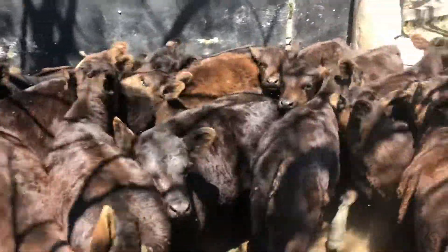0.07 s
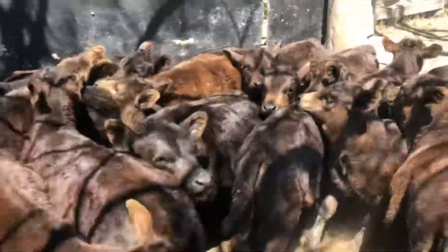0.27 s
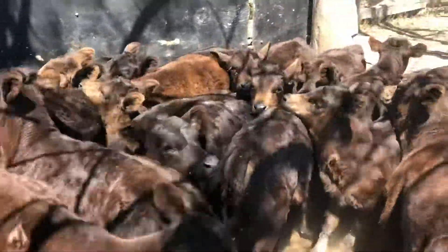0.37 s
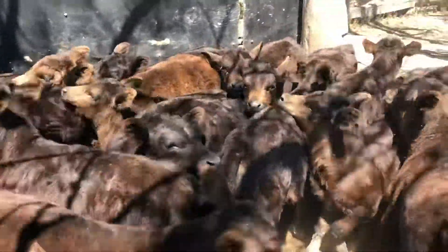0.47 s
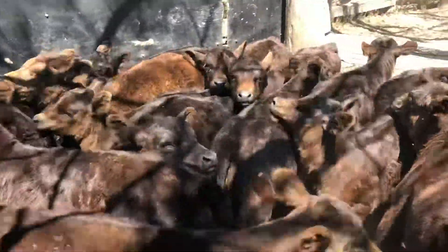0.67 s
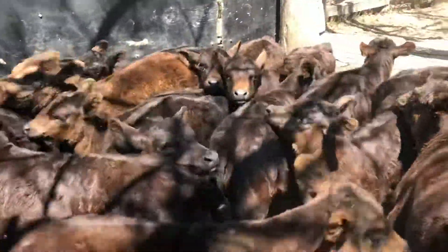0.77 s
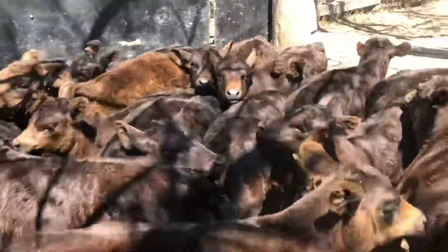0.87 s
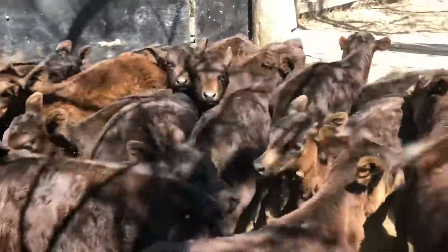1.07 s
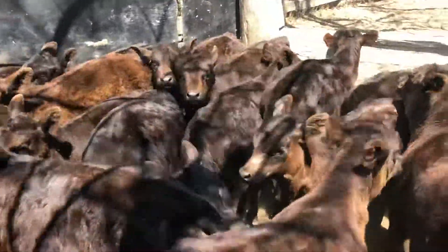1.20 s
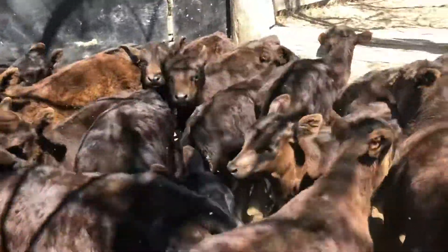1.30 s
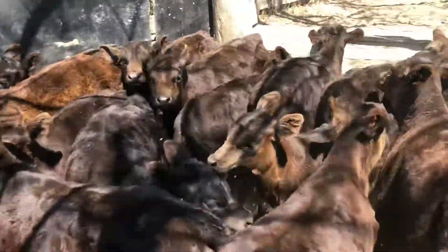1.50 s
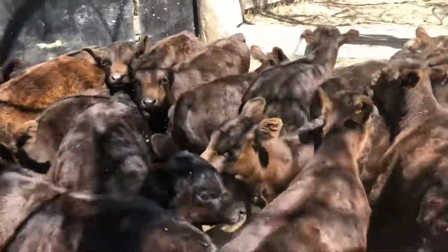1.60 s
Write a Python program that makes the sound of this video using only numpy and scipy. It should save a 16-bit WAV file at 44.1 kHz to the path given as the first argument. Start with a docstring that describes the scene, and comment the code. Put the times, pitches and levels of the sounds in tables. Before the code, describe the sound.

A calf's rising moo breaks into a rough bawl, with hooves shuffling in dirt.

```python
"""An outdoor pen crowded with calves. Close by, one starts a closed-mouth moo that climbs in pitch, opens
its mouth into a hoarse bawl with two pitches at once, and drops off in a grunt; a softer low moo follows.
Each call is a train of vocal-fold pulses ringing through the throat. Hooves thud and tick in the dirt,
flanks knock, hides rub, and the pen walls throw back a short echo over the hush of the yard."""
import sys
import numpy as np
from scipy import signal
from scipy.fft import rfft, irfft
from scipy.io import wavfile
from scipy.ndimage import uniform_filter1d

SR = 44100
rng = np.random.default_rng(int(sys.argv[2]) if len(sys.argv) > 2 else 0)


def master_out(mix):
    """Clip the mix to full scale and print it as 16-bit PCM to the path in sys.argv[1]."""
    frames = np.transpose(np.atleast_2d(mix))
    ceiling = np.clip(frames, -1, 1)
    pcm = np.round(ceiling * 32767).astype(np.int16)
    wavfile.write(sys.argv[1], SR, pcm)


N = 72765

# the close calf's regular fold vibration, in moo and grunt: (time [s], pitch [Hz])
CALF_PITCH = [(0, 81), (.036, 87), (.1, 97), (.17, 109), (.22, 117.5), (.296, 135), (.35, 158), (.4, 184),
              (.48, 220), (.58, 250), (.7, 270), (1.28, 305), (1.325, 220), (1.35, 165), (1.39, 102),
              (1.45, 85)]


def bawl():
    """Two fold vibrations at once, through a throat that brightens as the mouth opens."""
    # the hoarse, unsteady vibration: (time [s], pitch [Hz])
    hoarse_pitch = [(.48, 313.7), (.6, 319.1), (.72, 323.8), (.82, 317.7), (.92, 328.5), (1.02, 316.5),
                    (1.15, 316.2), (1.28, 318), (1.33, 294.4), (1.4, 222)]
    # the cleaner, higher one: (time [s], pitch [Hz], strength against the hoarse one [ratio])
    squeal_curve = [(.48, 324.9, 0.13), (.53, 357.9, 1), (.59, 386, 0.74), (.7, 415, 0.19),
                    (.83, 438.3, 0.29), (.94, 444.2, 1), (1.02, 445.7, 0.28), (1.15, 451.4, 0.44),
                    (1.23, 447, 0.13), (1.32, 435.5, 0.084)]
    # how hard the calf pushes: (time [s], level [dB])
    effort = [(.44, -65), (.475, -32.5), (.51, -27.5), (.56, -28.5), (.6, -26.5), (.72, -23.5), (.84, -23),
              (.92, -26), (.965, -22), (1.0, -25), (1.07, -21), (1.17, -22), (1.22, -24.5), (1.335, -24),
              (1.365, -43), (1.4, -66), (1.45, -78)]
    # mouth and strain: (time [s], mouth opening [0-1], roughness [0-1])
    strain = [(.48, 0, .5), (.72, 0.48, 0.49), (.84, 0.77, 0.62), (.94, 0.96, .6), (1.15, 1, 0.61),
              (1.31, 0.92, 0.68)]
    # throat resonances: (centre [Hz], width [Hz], mouth half open [dB], wide open [dB])
    formants = [(242.3, 30.4, 5.5, -13), (326, 99, -7.5, -6.5), (435, 48, -11.5, -10), (604.5, 49, 0, 1),
                (701.3, 72, -2.5, 2.5), (805, 30, -4, 0.5), (922.2, 31.2, 8.5, 3), (985.3, 78.4, 2, 6.5),
                (1150, 39, -11, 1), (1262.5, 46.4, -4.5, 2.5), (1363, 35, -27, 4), (1565, 112, -8.5, 0.5),
                (1788, 204, -9.5, -3), (2097, 205, -13, -7.5), (2657, 425, -25, -16.5)]
    # faint upper resonances: (centre [Hz], width [Hz], mouth half open [dB], wide open [dB])
    upper_formants = [(3516, 117, -54, -26), (4150, 130, -40, -29), (4507, 65, -30, -27.5),
                      (5500, 85, -38, -27.5), (5950, 350, -50, -31.5), (7020, 110, -41, -30.5),
                      (7500, 660, -43, -38), (8870, 710, -44, -38)]
    (pitch_hz,), (effort_db,) = in_time(hoarse_pitch), in_time(effort)
    mouth, rough = in_time(strain)
    squeal_hz, squeal_gain = in_time(squeal_curve)
    hoarse, _ = folds(pitch_hz, rough, half_lines=.23)
    squeal, _ = folds(squeal_hz, rough=.11, half_lines=.44)
    source = hoarse + squeal_gain * squeal
    opening_formants = [(hz, width, half_db + mouth * (wide_db - half_db))
                        for hz, width, half_db, wide_db in formants + upper_formants]
    shimmer_db = 1.2 * rough * drift(28)
    return throat(source, opening_formants) * from_db(effort_db + shimmer_db)


def moo():
    """Clean fold pulses behind a closed mouth, over a nasal hum; leads into the bawl and closes it."""
    # the moo's swell: (time [s], level [dB])
    swell = [(0, -72), (.04, -50.5), (.08, -46.5), (.15, -39), (.28, -34), (.37, -30.5), (.43, -28.5),
             (.465, -34.5), (.54, -40), (.68, -35.5), (.8, -64), (1.25, -73), (1.33, -41), (1.38, -46),
             (1.45, -78)]
    # the two lowest partials, through the nose: (time [s], fundamental [dB], octave [dB])
    nasal_partials = [(0, -64, -52), (.06, -44.5, -45), (.2, -39, -54), (.29, -51, -45), (.35, -57, -53),
                      (.41, -42.5, -51), (.5, -33, -56), (.56, -38, -71), (.72, -75, -59), (1.25, -73, -73),
                      (1.335, -33, -37.5), (1.39, -45.5, -50), (1.46, -60, -75)]
    # the throat with the mouth closed: (centre [Hz], width [Hz], level [dB])
    formants = [(186.5, 96, -2), (333, 60, -7), (601, 58, -9.5), (754, 77, -8), (963, 85, 2),
                (1260, 60, -5), (1335, 97, -1.5), (1682, 75, -6.5), (1830, 25, -9.5), (2158, 92, -10.5),
                (2458, 84, -10.5), (2814, 51, -16.5), (3043, 73, -18.5), (3380, 120, -22.5)]
    (pitch_hz,), (level_db,) = in_time(CALF_PITCH), in_time(swell)
    fundamental_db, octave_db = in_time(nasal_partials)
    source, cycles = folds(pitch_hz, rough=.07)
    phase = 2 * np.pi * cycles
    hum = from_db(fundamental_db) * np.cos(phase) + from_db(octave_db) * np.cos(2 * phase)
    return throat(source, formants) * from_db(level_db) + np.sqrt(2) * hum


def grunt():
    """As the bawl collapses, the slackening folds rattle through the closing throat."""
    # the grunt's swell: (time [s], level [dB])
    swell = [(1.2, -80), (1.28, -42), (1.335, -35), (1.365, -37.5), (1.4, -43), (1.44, -54), (1.5, -68)]
    # the closing throat: (centre [Hz], width [Hz], level [dB])
    formants = [(238, 50.9, 3), (322, 75.4, 2.5), (400, 130, -10), (622, 98, -5)]
    (pitch_hz,), (level_db,) = in_time(CALF_PITCH), in_time(swell)
    source, _ = folds(pitch_hz, rough=.257)
    return throat(source, formants) * from_db(level_db)


def low_moo():
    """A quiet, grainy moo with the mouth nearly shut."""
    # the call's contour: (time [s], pitch [Hz], level [dB])
    contour = [(1.42, 90.5, -58), (1.48, 96.5, -45), (1.52, 99.5, -44.5), (1.55, 97.5, -42.5),
               (1.59, 99.6, -40.5), (1.65, 100.2, -42.5)]
    # its throat: (centre [Hz], width [Hz], level [dB])
    formants = [(101, 73, -1), (223, 56, 6), (337, 69, 4.5), (526, 140, -1.5), (940, 52, 6),
                (1204, 210, -5.5), (1745, 95, -2.5), (1844, 87, -3.5)]
    pitch_hz, level_db = in_time(contour)
    source, _ = folds(pitch_hz, rough=.4)
    started = since(contour[0][0]) > 0
    return throat(source, formants) * from_db(level_db) * started


def folds(pitch_hz, rough, half_lines=0):
    """Vocal folds, one pulse a cycle; roughness adds jitter and rasp. Also returns the cycle count."""
    jitter = .04003 * rough * drift(70.5)
    cycles = np.cumsum(pitch_hz * (1 + jitter)) / SR
    count = np.floor(cycles)
    alternation = 1 + half_lines * (-1) ** count  # strong and weak in turn: a growl an octave down
    heights = np.diff(count, prepend=0) * np.sqrt(SR / pitch_hz) * alternation
    late = (cycles - count) * SR / pitch_hz  # splits each pulse between two samples
    pulses = heights * (1 - late) + np.roll(heights * late, -1)
    rasp = rng.standard_normal(N) * (1 + np.cos(2 * np.pi * cycles))
    return (1 - rough) * pulses + .82 * rough * rasp, cycles


def throat(source, formants):
    """Parallel resonances shape the pulses; the voice is then held at unit level."""
    voice = sum(resonance(source, hz, width) * from_db(db) for hz, width, db in formants)
    power = np.abs(uniform_filter1d(voice ** 2, size=1300))
    return voice / np.sqrt(power + 1e-12)


def jostling():
    """Soft hoof thuds, hollow knocks of flanks and snaps of grit."""
    # hooves landing in dirt: (time [s], level [dB], pitch [Hz])
    thuds = [(0.029, -34, 92), (0.208, -34, 61), (.385, -37, 70), (0.538, -40.5, 75), (.7, -34.5, 86),
             (0.818, -32.5, 71.12), (0.924, -37.5, 58.47), (1.188, -39.5, 71), (1.285, -40, 62.4),
             (1.616, -39, 87.1)]
    # flanks knocking together: (time [s], level [dB])
    knocks = [(.028, -40.5), (.401, -26.5)]
    # a flank's hollow ring: (pitch [Hz], level [dB], time to fall 60 dB [s])
    flank_modes = [(187.6, 0.5, 0.15), (292, -6.5, 0.054), (342, -2, 0.045)]
    # grit snapping under hooves: (time [s], level [dB], centre [Hz])
    ticks = [(0.2566, -44.5, 4420), (0.387, -43.5, 7950), (.412, -40, 5600), (0.7172, -40.5, 12000),
             (0.8616, -52, 6519), (.894, -48, 12000), (1.3983, -49, 9114)]
    thud_attack_s, thud_decay_s, tick_decay_s = .01, .018, .0037
    out = np.zeros(N)
    for s, db, hz in thuds:
        t = since(s)
        envelope = (1 - np.exp(-t / thud_attack_s)) * np.exp(-t / thud_decay_s)
        out += 2 * from_db(db) * envelope * np.sin(2 * np.pi * hz * t)
    for s, db in knocks:
        t = since(s)
        for hz, mode_db, t60 in flank_modes:
            out += from_db(db + mode_db - 60 * t / t60) * np.sin(2 * np.pi * hz * t)
    for s, db, hz in ticks:
        t = since(s)
        snap = rms_one(resonance(rng.standard_normal(N), hz, width_hz=hz))
        out += from_db(db) * (t > 0) * np.exp(-t / tick_decay_s) * snap
    return out


def scuffing():
    """A soft rub of hides with grains of dirt in it."""
    # hides rubbing and feet scuffing: (time [s], level [dB])
    swell = [(0, -57.5), (.2, -48.5), (.29, -48), (.36, -42.5), (.47, -52.5), (.54, -46.5), (.66, -58),
             (.8, -49), (.93, -43), (1.05, -48.5), (1.35, -47.5), (1.46, -64), (1.54, -57.5), (1.65, -60.5)]
    # the rub's tone colour: (frequency [Hz], level [dB])
    colour = [(500, -58.5), (2000, 31.5), (4000, 6), (7000, 3), (11000, 4.5), (16000, 2)]
    grains_per_s, grain_decay_s, grit_db = 350, .00043, 3
    onsets = rng.random(N) < grains_per_s / SR
    grains = onsets * from_db(2.8 * np.minimum(rng.exponential(1, N), 4))
    grain_envelope = signal.lfilter([1], [1, -np.exp(-1 / (grain_decay_s * SR))], grains + 1e-18)
    grit = from_db(grit_db) * rms_one(grain_envelope * rng.standard_normal(N))
    level_db = in_time(swell)[0] + .5 * drift(12)
    return from_db(level_db) * coloured(rng.standard_normal(N) + grit, colour)


def pen_echo(x):
    """Two wall echoes and a short, dull scatter from the herd; the bass is hardly thrown back."""
    # slaps off the pen walls: (delay [s], level [dB])
    walls = [(0.0117, -15), (0.0248, -25)]
    scatter_db, t60_s, low_cut_hz, high_cut_hz = -6.5, .24, 250, 4700
    t = np.arange(SR // 2) / SR
    dull = signal.sosfilt(signal.butter(2, high_cut_hz, fs=SR, output="sos"), rng.standard_normal(len(t)))
    tail = rms_one(dull) * from_db(-60 * t / t60_s) * (t > .008)
    passband_gain = np.sqrt(np.sum(tail ** 2) * SR / 2 / high_cut_hz)
    response = from_db(scatter_db) * tail / passband_gain
    for delay_s, db in walls:
        response[int(delay_s * SR)] += from_db(db)
    echo = signal.fftconvolve(x, response)[:N]
    return signal.sosfilt(signal.butter(2, low_cut_hz, "high", fs=SR, output="sos"), echo)


def yard():
    """A steady, bass-heavy bed of outdoor hush."""
    # the yard's tone colour: (frequency [Hz], level [dB])
    colour = [(20, -35), (35, -11), (55, -4), (100, -5.5), (250, -2.5), (500, -23), (1000, -8.5),
              (2000, -36), (4000, -22.5), (16000, -36.5)]
    return from_db(-47.5) * coloured(rng.standard_normal(N), colour)


def from_db(db):
    """Decibels to gain."""
    return 10 ** (np.asarray(db) / 20)


def rms_one(x):
    """Scale to unit rms."""
    return x / np.sqrt(np.mean(x ** 2) + 1e-20)


def since(s):
    """Seconds since a moment, zero before it."""
    return np.maximum(np.arange(N) / SR - s, 0)


def in_time(rows):
    """Each column of a timed curve, at every sample."""
    s, *columns = np.transpose(rows)
    return [np.interp(np.arange(N) / SR, s, c) for c in columns]


def drift(rate_hz):
    """A smooth random wander at unit rms."""
    pole = np.exp(-2 * np.pi * rate_hz / SR)
    return rms_one(signal.lfilter([1], [1, -2 * pole, pole * pole], rng.standard_normal(N + SR))[SR:])


def coloured(x, colour):
    """Give a noise a tone colour, at unit rms."""
    hz, db = np.transpose(colour)
    bins_hz = np.maximum(np.fft.rfftfreq(N, 1 / SR), 1)
    gain = from_db(np.interp(np.log(bins_hz), np.log(hz), db))
    return rms_one(irfft(rfft(x) * gain, N))


def resonance(x, hz, width_hz):
    """A steep-sided resonance with unit gain at its peak."""
    middle_hz = np.sqrt(hz ** 2 + width_hz ** 2 / 4)
    band = [middle_hz - width_hz / 2, min(middle_hz + width_hz / 2, SR / 2 - 100)]
    return signal.sosfilt(signal.butter(2, band, "band", fs=SR, output="sos"), x)


def scene():
    """Calls and movement in the pen over the yard's hush; the closed-mouth moo stirs less echo."""
    closed_moo = moo()
    herd = bawl() + grunt() + low_moo() + jostling()
    hush = yard()
    echo = pen_echo(herd + .75 * closed_moo)
    return (closed_moo + herd + echo + scuffing() + hush)[None]


def record(dry):
    """The deepest bass and the very top are cut."""
    low_cut_hz, high_cut_hz = 42, 15800
    dry = signal.sosfilt(signal.butter(4, low_cut_hz, "high", fs=SR, output="sos"), dry)
    return signal.sosfilt(signal.ellip(10, .1, 80, high_cut_hz, fs=SR, output="sos"), dry)


dry = scene()
out = record(dry)
master_out(out)
```